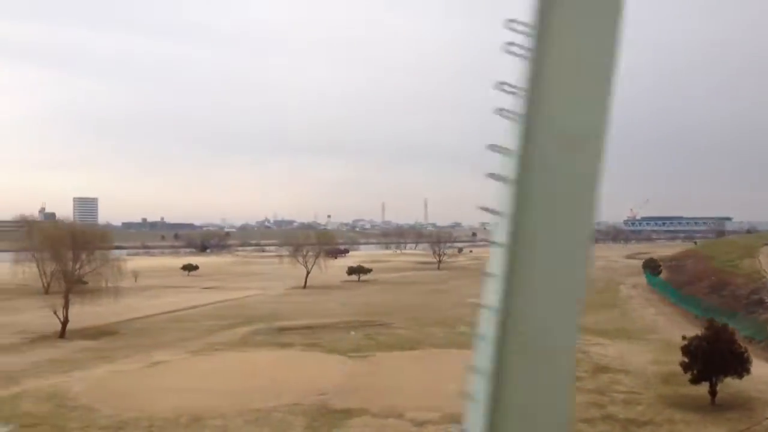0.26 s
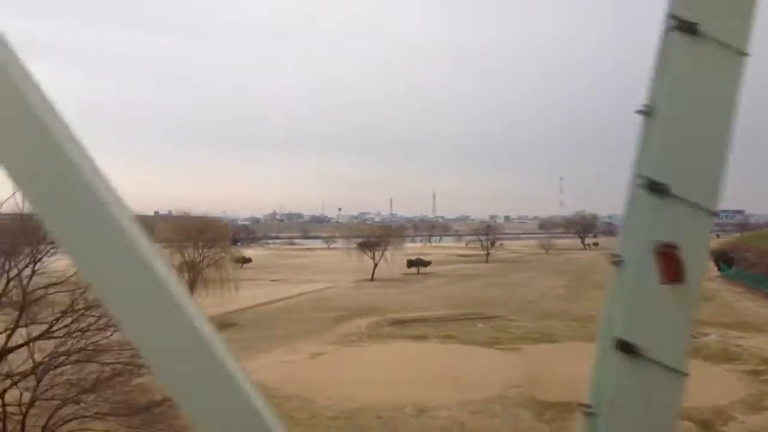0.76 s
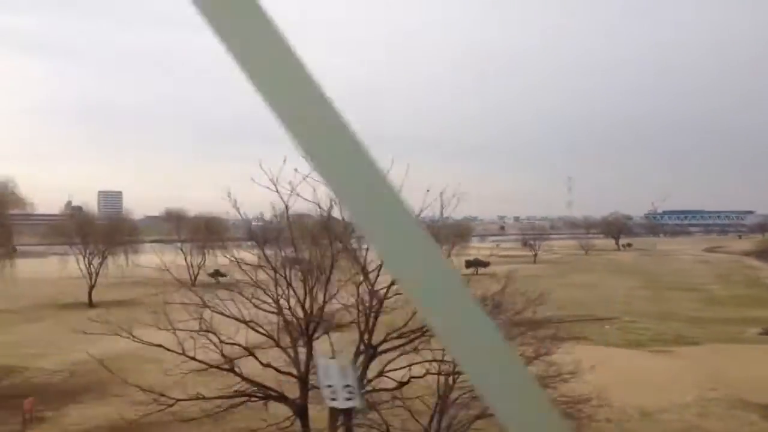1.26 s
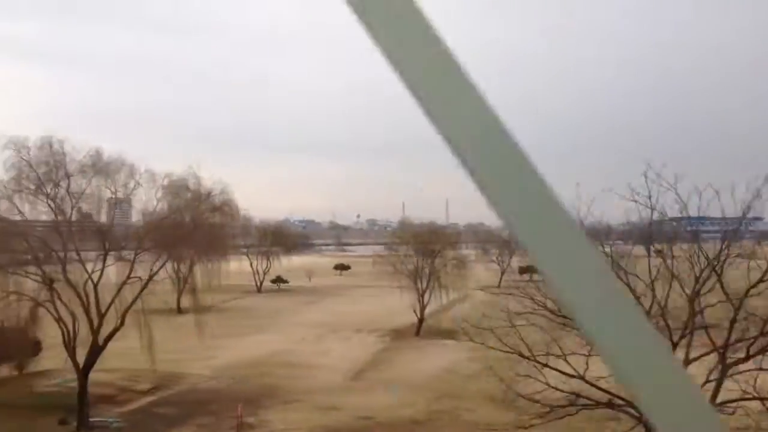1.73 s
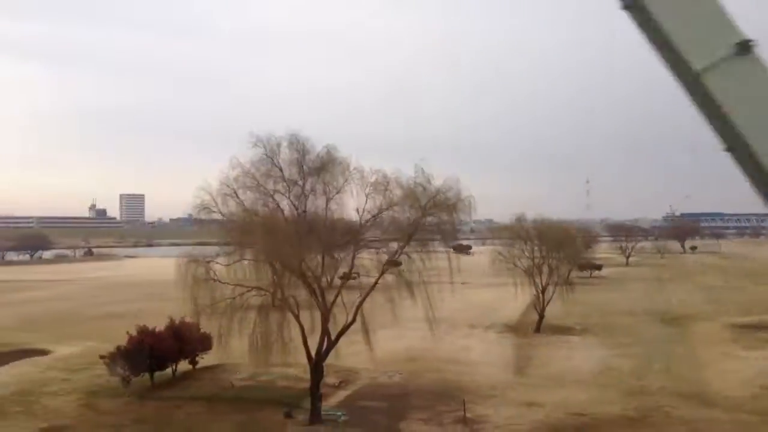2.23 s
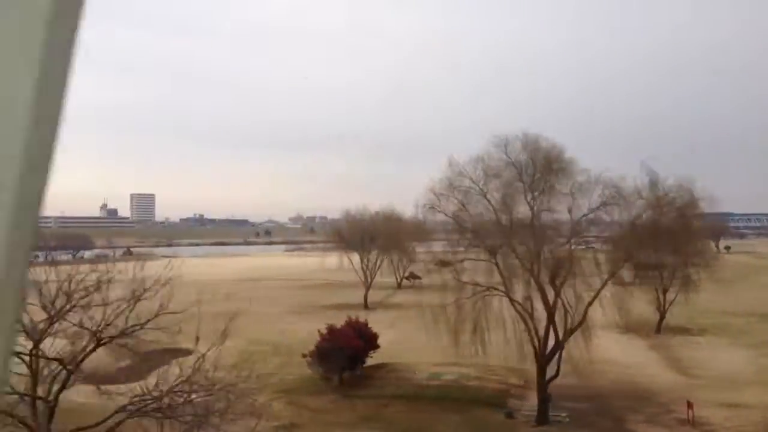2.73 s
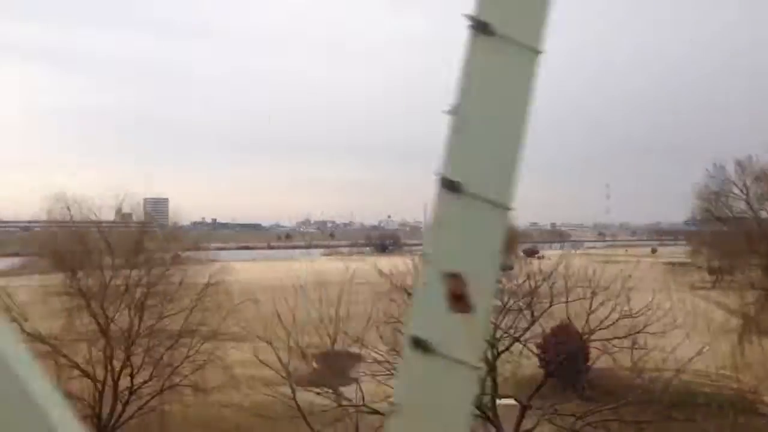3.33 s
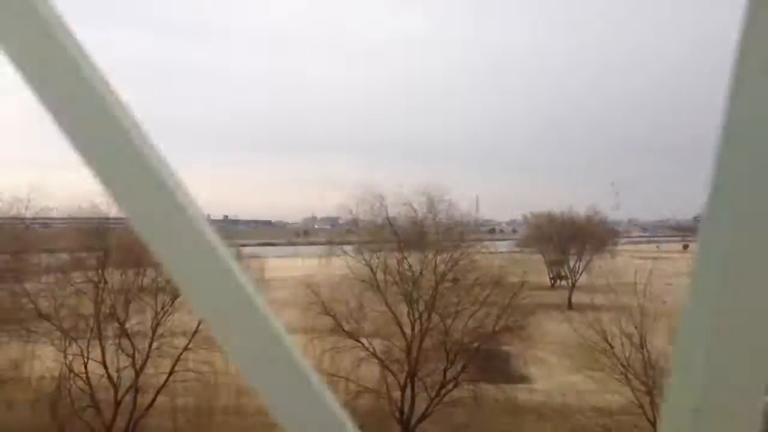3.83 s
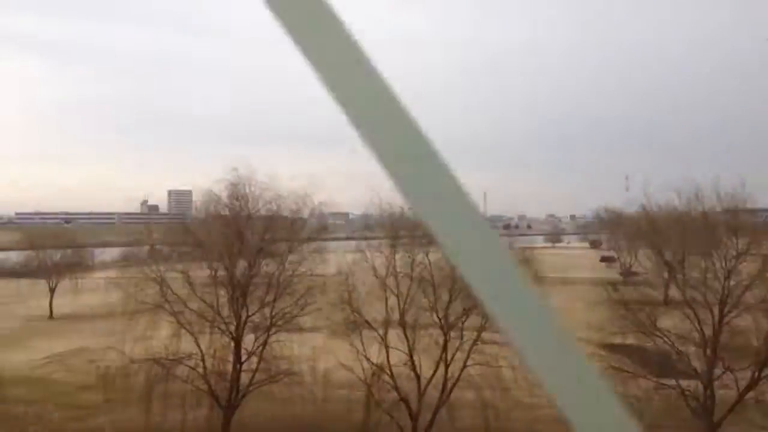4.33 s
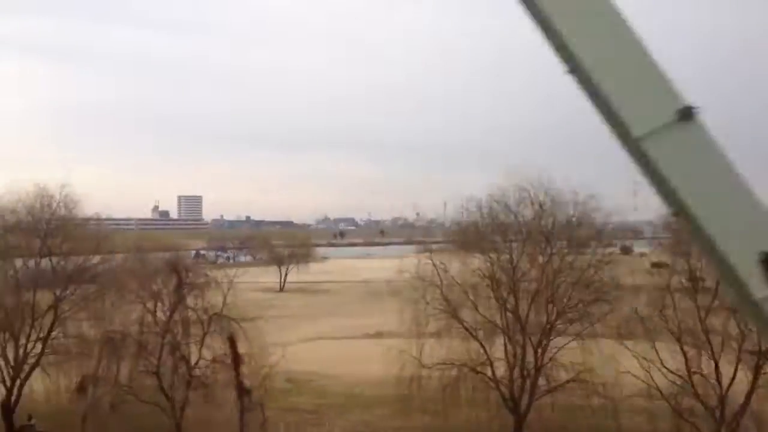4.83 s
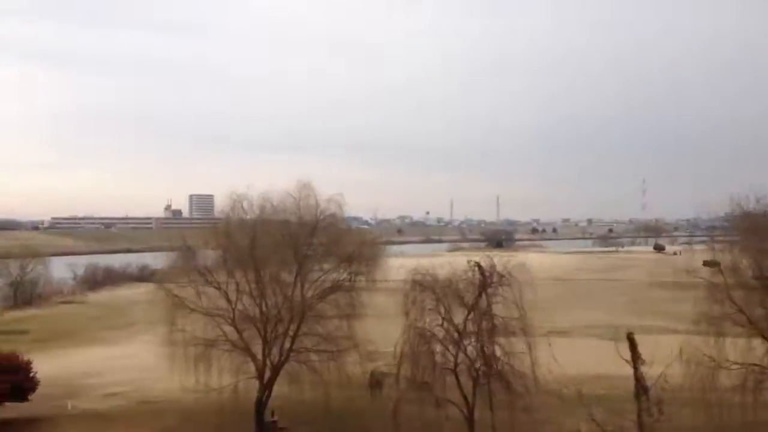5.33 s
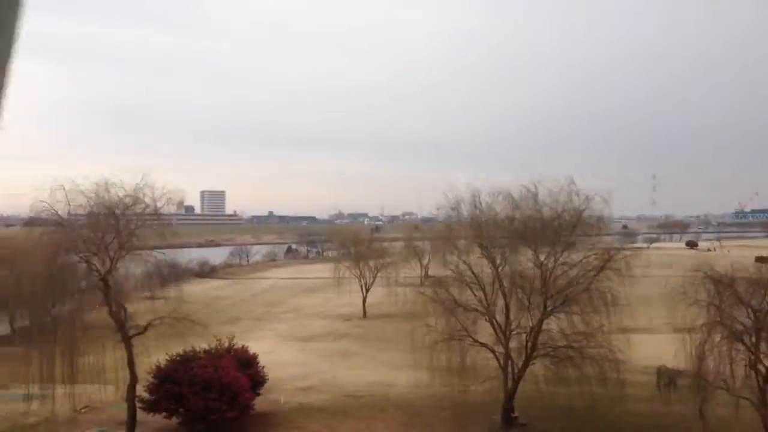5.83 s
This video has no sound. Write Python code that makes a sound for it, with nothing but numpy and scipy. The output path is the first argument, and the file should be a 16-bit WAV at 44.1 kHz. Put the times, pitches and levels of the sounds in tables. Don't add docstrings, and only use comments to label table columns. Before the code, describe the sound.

Heard from inside a moving carriage on a steel truss bridge: a loud, wavering low boom and rough wheel hiss run throughout. About once a second four axles cross a joint as two quick pairs, each blow a blurred steel clang with a brief wheel ring and low thump. Dull floor knocks, tiny pings and a faint gear whine fill the gaps.

```python
import sys
import numpy as np
from scipy import signal
from scipy.fft import rfft, irfft, next_fast_len
from scipy.io import wavfile
from scipy.ndimage import uniform_filter1d

SR = 44100
rng = np.random.default_rng(int(sys.argv[2]) if len(sys.argv) > 2 else 0)


def gain_from_db(level_db):
    decades = np.asarray(level_db, float) / 20
    return 10 ** decades


def wav_record(signal):
    frames = np.transpose(np.atleast_2d(signal))
    bounded = np.clip(frames, -1, 1)
    quanta = np.round(bounded * 32767).astype(np.int16)
    wavfile.write(sys.argv[1], SR, quanta)


N = 268559


def rms_one(x):
    return x / np.sqrt(np.mean(x ** 2) + 1e-20)


def in_time(rows):
    s, *columns = np.transpose(rows)
    return [np.interp(np.arange(N) / SR, s, column) for column in columns]


def drift(rate_hz):
    r = np.exp(-80 * np.pi * rate_hz / SR)
    noise = rng.standard_normal(N // 40 + 2002)
    slow = signal.lfilter([1], [1, -2 * r, r * r], noise)[2000:]
    return np.interp(np.arange(N) / 40, np.arange(len(slow)), rms_one(slow))


def resonate(x, hz, width_hz):
    r = np.exp(-np.pi * width_hz / SR)
    zeros = np.array([1, 0, -1]) * (1 - r * r) / 2
    poles = [1, -2 * r * np.cos(2 * np.pi * hz / SR), r * r]
    return signal.lfilter(zeros, poles, x)


def octave_slices(colour):
    size = next_fast_len(N)
    hz = np.maximum(np.arange(size // 2 + 1) * SR / size, 1)
    colour_hz, colour_db = np.transpose(colour)
    shape = gain_from_db(np.interp(np.log(hz), np.log(colour_hz), colour_db, right=-90))
    spectrum = rfft(rng.standard_normal(size)) * shape / np.sqrt(np.mean(shape ** 2))
    for centre in 30 * 2 ** np.arange(0, 9.6, .5):
        share = np.cos(np.pi / 2 * np.clip(2 * np.log2(hz / centre), -1, 1)) ** 2
        yield centre, irfft(spectrum * share, size)[:N]


def mode_cluster(modes, level_db, thump_db):
    force = rng.standard_normal((len(modes), N))
    blows = np.zeros(N)
    hits = [max(round((row[0] + .012) * SR), 0) for row in AXLES]
    blows[hits] = gain_from_db([row[1] + row[2] for row in AXLES])
    ringing, thumps = 0, 0
    for push, (hz, width_hz, db) in zip(force, modes):
        ringing = ringing + gain_from_db(db) * resonate(push, hz, width_hz) / np.sqrt(width_hz)
        thumps = thumps + gain_from_db(db) * resonate(blows, hz, width_hz) / width_hz
    swing = np.sqrt(uniform_filter1d(rms_one(ringing) ** 2, size=SR // 25) + 0.046)
    ringing = ringing / swing ** 0.7
    steep = signal.butter(3, [108, 520], "band", fs=SR, output="sos")
    return signal.sosfilt(steep, gain_from_db(level_db) * rms_one(ringing) + gain_from_db(thump_db) * SR * thumps)


# time in seconds, level of the lower modes in dB, of the upper modes in dB.
BOOM_CURVE = [(0.0, -9, -12), (0.03, -18.5, -17), (0.2, -18, -21), (0.25, -24, -23.5), (0.46, -16, -22),
              (0.54, -24, -21), (0.57, -18, -25), (0.64, -13.5, -14.5), (0.68, -18, -18), (0.71, -13, -10),
              (0.78, -23, -17), (0.83, -13, -17.5), (0.86, -20.5, -11.5), (1.12, -19, -18),
              (1.15, -25, -18), (1.25, -19, -21.5), (1.56, -26, -17.5), (1.59, -16.5, -19.5),
              (1.63, -26, -21), (1.7, -17, -13), (1.73, -21, -16), (1.8, -10.5, -11.5), (1.81, -13, -17.5),
              (1.95, -16.5, -10.5), (2.05, -11.5, -14), (2.09, -15, -14), (2.22, -20.5, -27.5),
              (2.26, -23, -23), (2.29, -17.5, -16), (2.36, -21.5, -23.5), (2.63, -22, -20),
              (2.66, -25, -22.5), (2.76, -17.5, -13), (2.78, -5, -22), (2.81, -22, -12.5),
              (2.86, -12.5, -9.5), (2.93, -22, -20), (2.97, -14.5, -9.5), (3.05, -16, -12.5),
              (3.14, -21, -19), (3.42, -22, -22), (3.56, -24, -24.5), (3.6, -19, -18.5), (3.65, -24, -24),
              (3.68, -17.5, -26.5), (3.78, -16.5, -17.5), (3.83, -24, -15.5), (3.92, -15, -15.5),
              (3.97, -18, -18.5), (4.05, -13, -14), (4.09, -15, -16), (4.16, -21, -14.5), (4.19, -19, -18),
              (4.58, -26, -22.5), (4.61, -16, -26), (4.65, -23, -19), (4.85, -20.5, -20),
              (4.94, -16, -12.5), (4.97, -26, -18), (5.02, -25.5, -18.5), (5.11, -13, -9.5),
              (5.15, -21, -18.5), (5.19, -15, -13), (5.22, -20, -16), (5.41, -21, -22), (5.63, -19, -20),
              (5.85, -21, -19.5), (5.9, -14, -11.5), (6.02, -15, -12.5), (6.09, -20, -16.5)]
# frequency in Hz, width in Hz, level in dB.
LOWER_MODES = [(130.2, 14, 0), (163.2, 18.7, 2.5), (187.2, 12.7, -1.5), (212.7, 35, -4.5)]
# frequency in Hz, width in Hz, level in dB.
UPPER_MODES = [(260, 16.4, 1.5), (288, 20, 3.5), (309, 21, -4.5), (350.7, 22, -1.5), (391.2, 16, -5.5),
               (432, 12, -10.5), (481, 18, -13.5)]


def girders():
    lower_db, upper_db = in_time(BOOM_CURVE)
    lower = mode_cluster(LOWER_MODES, lower_db, thump_db=-10.5)
    return lower + mode_cluster(UPPER_MODES, upper_db, thump_db=-11)


# time in seconds, level in dB, extra brightness in dB.
ROLL_CURVE = [(0.0, -29, -0.5), (0.47, -26.5, -1), (0.85, -26.5, 4), (1.07, -28.5, 2.5), (1.58, -26, -1),
              (1.88, -25, 2), (2.36, -29, 0), (2.61, -27.5, -1), (2.95, -27.5, 5), (3.15, -28, -2),
              (3.32, -28.5, 1), (3.65, -27.5, -1), (3.95, -26, 0), (4.05, -27, 4), (4.21, -29, 1),
              (4.43, -29, -1), (4.68, -27.5, 0), (5.07, -26, 2.5), (5.44, -28, 1.5), (5.73, -26.5, 0),
              (6.09, -24.5, 1)]
# frequency in Hz, density in dB per Hz.
ROLL_COLOUR = [(30, -32), (60, -8.5), (95, 2.5), (550, -0.5), (1010, 0.5), (1080, -3.5), (1500, -7.5),
               (2750, -8.5), (3300, -19), (4100, -21.5), (6600, -24), (8300, -32.5), (9800, -43),
               (15500, -48.5)]
# frequency in Hz, width in Hz, level in dB.
PANELS = [(1005, 23, -47), (4520, 460, -58), (4680, 31, -68)]


def rolling(patchy_db):
    level_db, bright_db = in_time(ROLL_CURVE)
    together, out = drift(8), 0
    for hz, band in octave_slices(ROLL_COLOUR):
        high = np.clip(np.log2(hz / 2000), 0, 1)
        patches = .5 * together + drift(9)
        out = out + band * gain_from_db(high * bright_db + patchy_db * patches)
    for hz, width_hz, db in PANELS:
        once = resonate(rng.standard_normal(N), hz, width_hz)
        out = out + gain_from_db(db + 27) * rms_one(resonate(once, hz, width_hz))
    return gain_from_db(level_db) * out


# time in seconds, level in dB.
WHINE_LEVEL = [(0, -44), (.6, -45), (1.35, -45.5), (1.5, -57), (1.75, -43), (2.1, -53), (2.8, -53),
               (3.1, -47), (3.3, -49), (4.1, -50.5), (4.25, -41), (4.5, -43), (4.65, -51), (4.9, -39),
               (5.3, -42.5), (5.7, -40), (6.09, -39)]
# time in seconds, frequency in Hz.
WHINE_PITCH = [(0, 2740), (1.4, 2731), (3.1, 2726), (4.3, 2712), (5.2, 2709), (6.09, 2701)]


def whine():
    (hz,), (db,) = in_time(WHINE_PITCH), in_time(WHINE_LEVEL)
    waver_hz, waver_db = 3.5, 2.2
    gain = np.sqrt(2) * gain_from_db(db + waver_db * drift(18))
    return gain * np.sin(2 * np.pi * np.cumsum(hz + waver_hz * drift(10.5)) / SR)


# frequency in Hz, density in dB per Hz.
CLANG_COLOUR = [(300, -23), (520, 0.5), (1000, -5.5), (1500, -9), (2550, -6.5), (3300, -14.5), (3900, -19),
                (4600, -18), (5800, -21.5), (7000, -21.5), (8400, -28.5), (9600, -38.5), (12500, -42),
                (15500, -49)]
# time in seconds, clang level in dB, dull part in dB, bright part in dB,
# rise in seconds, 60 dB decay in seconds.
AXLES = [(-.03, -36, 3.5, 2.5, .02, 0.75), (.60, -30.5, 2, -6, 0.022, 0.66),
         (0.689, -32, 2, 2.5, 0.03, 0.32), (.845, -26, 1.5, -1.5, 0.019, 0.74),
         (0.939, -28, 1, 4.5, 0.024, 0.29), (1.656, -32, -5, -5, 0.027, 0.84),
         (1.745, -29.5, 0, 3, 0.018, 0.23), (1.898, -30, 2, -2, .025, 0.88),
         (2.0, -40, 2, -0.5, 0.014, 0.3), (2.702, -31, 0.5, -2, 0.031, 1), (2.79, -31, -2, 5, 0.014, 0.2),
         (2.945, -26.5, -0.5, -0.5, 0.029, 0.83), (3.051, -28.5, 6, 5, 0.04, 0.22),
         (3.744, -29, -2, -2.5, 0.018, 0.8), (3.835, -27, 1, 2.5, 0.026, 0.47),
         (4.0, -27, 2.5, 3, 0.017, 0.47), (4.092, -27, -1.5, -1.5, 0.039, 0.53),
         (4.799, -33, -9, -0.5, .03, .7), (4.894, -27.5, -1, 0.5, .03, 0.25),
         (5.054, -29.5, 3, 0.5, 0.021, 1), (5.155, -33, 8.5, 6.5, .03, 0.29),
         (5.86, -31, -8, -0.5, 0.024, .7), (5.945, -26.5, -5, -0.5, 0.013, 0.5)]


def joints(rattle_db):
    t = np.arange(0, N + 32, 32) / SR
    step = np.arange(N) / 32
    s, clang_db, dull_db, bright_db, rise, t60 = np.transpose(AXLES)[:, :, None]
    age = np.maximum(t - s, 0)
    swell = np.sin(np.pi / 2 * np.minimum(age / np.maximum(rise, .003), 1)) ** 2
    approach = gain_from_db(-11 + 250 * np.minimum(t - s, 0))
    together, out = drift(25), 0
    for hz, band in octave_slices(CLANG_COLOUR):
        lean = np.clip(np.log2(hz / 2400) / 0.89, -1, 1)
        tone_db = clang_db + np.maximum(-lean, 0) * dull_db + max(lean, 0) * bright_db
        band_t60 = t60 * (hz / 2400) ** -.08
        fade_db = -60 * (age / band_t60) ** 1.336
        power = np.sum((np.maximum(swell, approach) * gain_from_db(tone_db + fade_db)) ** 2, axis=0)
        envelope = np.interp(step, np.arange(len(t)), np.sqrt(power))
        out = out + band * envelope * gain_from_db(rattle_db * together)
    return gain_from_db(5.5) * out


# frequency in Hz, level in dB, 60 dB decay in seconds.
WHEEL_MODES = [(569, 0, 0.24), (693, 1, .2), (849, -2.5, 0.24), (1022, -2, .2), (1157, -5, .15),
               (1726, -6.5, .15), (1960, -3, .15), (2186, -2, 0.22), (2345, -5, 0.16), (2480, -4.5, 0.16),
               (2650, -3.5, 0.21), (3095, -5.5, 0.17), (4440, -10.5, 0.18)]


def wheel_rings(level_db, spread_db):
    out, t = np.zeros(N + SR), np.arange(SR // 4) / SR
    hz, mode_db, t60 = np.transpose(WHEEL_MODES)[:, :, None]
    soft_start = np.minimum(t / 0.0043, 1)
    for s, clang_db, dull_db, bright_db, rise, _ in AXLES:
        contacts = rise * .7 + np.array([0, .017, .04, .062]) * rng.uniform(.7, 1.3, 4)
        for late in contacts:
            strength, tuning, phase = rng.standard_normal((3, len(hz), 1))
            db = clang_db + level_db + mode_db + spread_db * strength - 60 * late - 60 * t / t60
            tone = np.sin(2 * np.pi * (hz * (1 + .012 * tuning) * t + phase))
            at = max(round((s + late) * SR), 0)
            out[at:][:len(t)] += np.sum(gain_from_db(db) * tone, axis=0) * soft_start
    return out[:N]


# start in seconds, peak level in dB, frequency in Hz, 60 dB decay in seconds.
FITTINGS = [(.015, -50, 11100, .12), (.555, -43, 8400, .1), (.725, -52, 11010, .12), (2.0, -56, 11010, .15),
            (4.266, -38, 13000, .0015), (.89, -56, 11010, .2), (1.03, -60, 11010, .15),
            (3.89, -56, 11010, .15), (5.125, -52, 11010, .12), (5.2, -58, 11010, .15),
            (5.716, -40, 10000, .0015), (5.69, -46, 8500, .002), (5.735, -46, 9000, .002),
            (5.955, -56, 10600, .06)]


def fittings():
    out = np.zeros(N)
    for s, db, hz, t60 in FITTINGS:
        at = round(s * SR)
        t = np.arange(min(SR // 6, N - at)) / SR
        attack = np.minimum(t / (.1 * t60), 1)
        out[at:at + len(t)] += gain_from_db(db - 60 * t / t60) * np.sin(2 * np.pi * hz * t) * attack
    return out


# start in seconds, peak level in dB, frequency in Hz.
KNOCKS = [(0.151, -7.5, 206), (0.277, -11, 253), (0.351, -3, 228), (0.577, -5, 170), (0.636, -1, 258),
          (0.689, -3, 288), (0.826, -3, 195), (0.898, -4, 278), (0.95, 1, 288), (1.002, -3, 216),
          (1.47, -8.5, 186), (1.665, -5, 269), (1.844, -11, 171), (2.076, -11, 266), (2.283, -5, 170),
          (2.393, -7, 170), (2.45, -9, 180), (2.488, -6, 264), (2.605, -1, 267), (2.677, -6.5, 151),
          (2.746, 3, 161), (2.957, 1, 288), (3.184, -2.5, 290), (3.231, -11, 248), (3.289, -8.5, 290),
          (3.502, -7, 293), (3.74, -5, 187), (3.883, 1, 288), (3.996, -3, 145), (4.032, 1, 170),
          (4.593, -12, 147), (4.915, -9, 268), (4.962, -3.5, 273), (5.174, -4.5, 143), (5.295, -5, 257),
          (5.563, -7, 153), (5.666, -1.5, 279), (5.699, -7, 256), (5.757, -4, 250), (5.819, -8, 300)]


def knocks(share_db, cycles):
    out, t = np.zeros(N + SR), np.arange(SR // 8) / SR
    for s, db, hz in KNOCKS:
        turn = hz * t / cycles
        push = np.e * turn * np.exp(-turn)
        out[round(s * SR):][:len(t)] -= gain_from_db(db + share_db) * push * np.sin(2 * np.pi * hz * t)
    return out[:N]


def scene():
    boom = girders() + knocks(share_db=-8.5, cycles=1.56)
    blows = joints(rattle_db=0.9) + wheel_rings(level_db=-8, spread_db=6)
    return (boom + rolling(patchy_db=0.66) + blows + whine() + fittings())[None]


def low_pass(x):
    return signal.sosfilt(signal.butter(12, 15210, fs=SR, output="sos"), x)


def record(dry):
    dry = dry - 0.45 * resonate(dry, hz=5090, width_hz=660)
    knee = .85
    over = np.maximum(np.abs(dry) - knee, 0)
    excess = over - (1 - knee) * np.tanh(over / (1 - knee))
    rounded = dry - np.sign(dry) * excess
    return low_pass(rounded)


dry = scene()
out = record(dry)
wav_record(out)
```